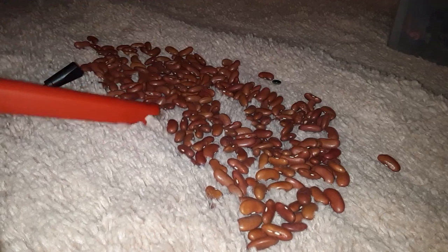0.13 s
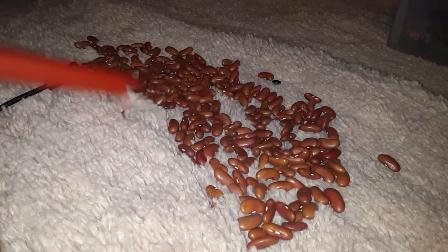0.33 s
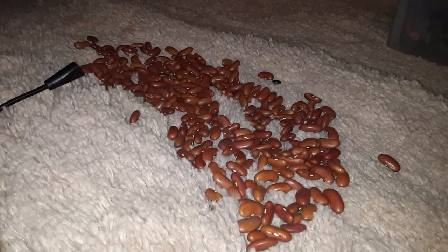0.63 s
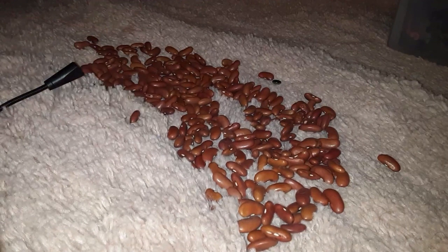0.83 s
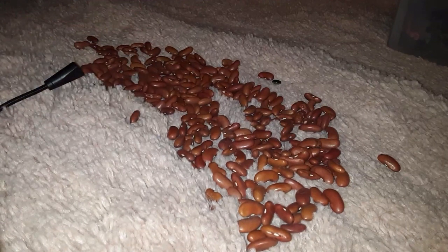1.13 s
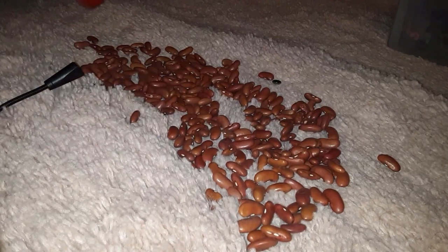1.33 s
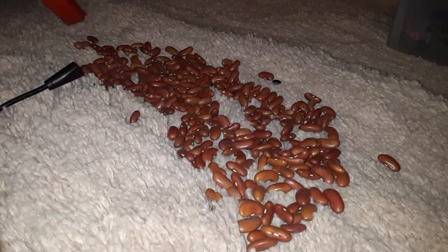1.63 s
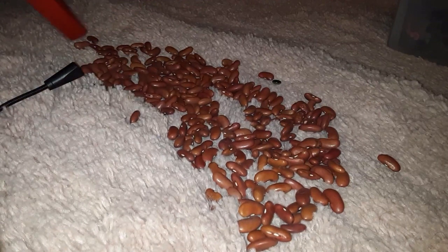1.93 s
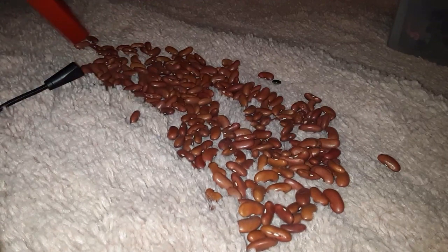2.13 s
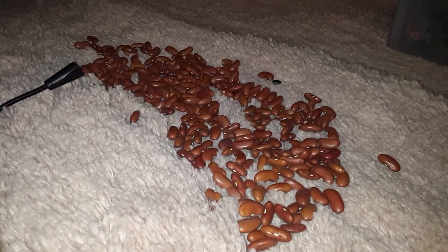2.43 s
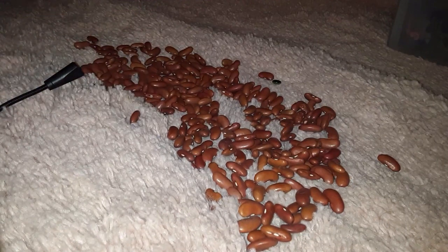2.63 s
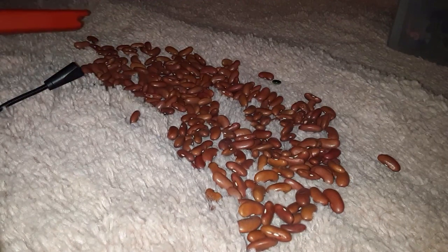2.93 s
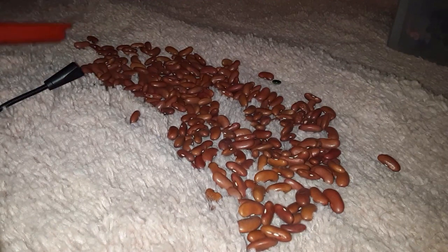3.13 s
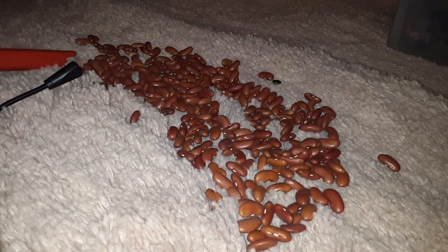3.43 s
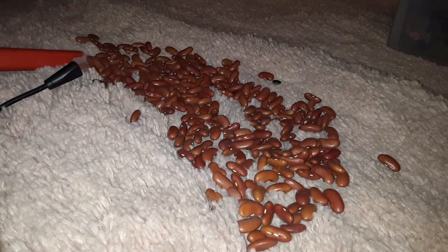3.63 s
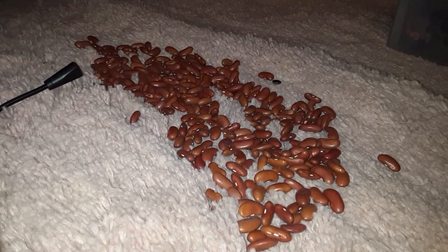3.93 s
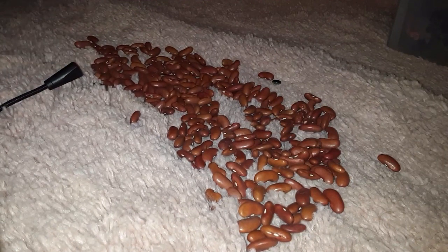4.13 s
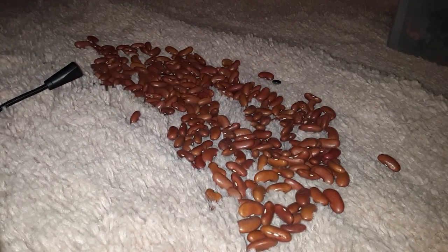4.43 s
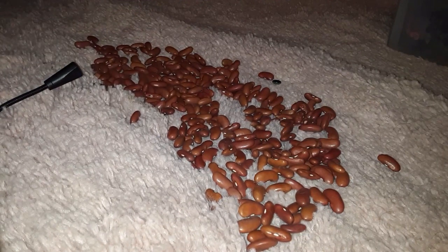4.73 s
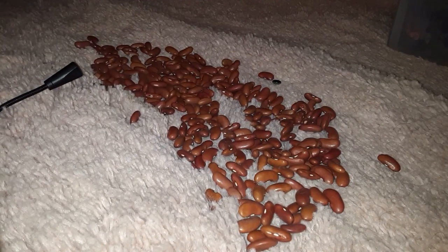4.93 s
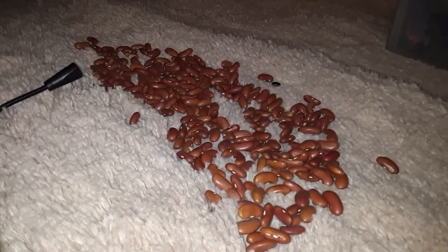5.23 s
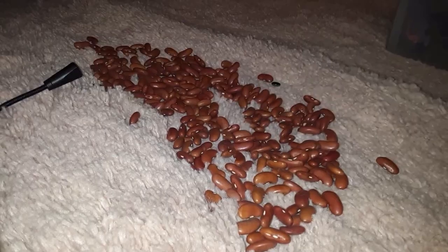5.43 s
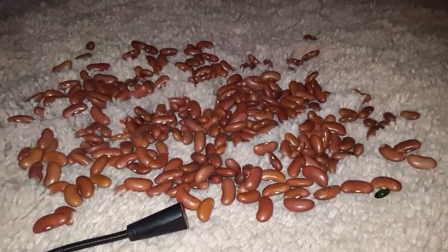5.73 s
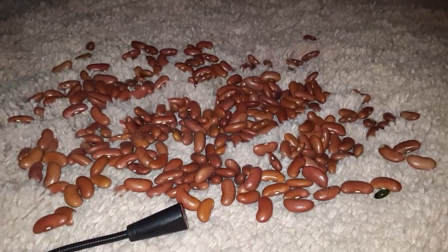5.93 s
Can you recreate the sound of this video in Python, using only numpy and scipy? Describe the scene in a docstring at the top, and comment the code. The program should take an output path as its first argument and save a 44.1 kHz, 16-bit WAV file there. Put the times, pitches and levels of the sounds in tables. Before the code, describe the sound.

A vacuum crevice tool swallows dry beans in two short rattling bursts, its airy hiss swelling and sinking near the carpet before the motor suddenly sounds close.

```python
"""A vacuum cleaner's crevice tool hovers over dry beans on a carpet, close to a small microphone. Its air is
coloured noise in two bands, a rush and a sizzle, swelling as the tool comes near the carpet. The motor hums
behind as shaft and blade tones over exhaust noise; at 5.6 s it suddenly grows much louder and fuller. Twice a
clump of beans rattles up the plastic tube as short ringing blows, chokes the air and lets the motor race. At
the end a short echo turns hiss and motor hollow."""
import sys
import numpy as np
from scipy import signal
from scipy.fft import rfft, irfft
from scipy.io import wavfile
from scipy.ndimage import uniform_filter1d, minimum_filter1d, map_coordinates

SR = 44100
rng = np.random.default_rng(int(sys.argv[2]) if len(sys.argv) > 2 else 0)


def wav_record(signal):
    """Record a signal, one row per channel, as 16-bit PCM in the file named by sys.argv[1]."""
    frames = np.transpose(np.atleast_2d(signal))
    bounded = np.clip(frames, -1, 1)
    # unit amplitude maps onto the largest positive 16-bit level
    quanta = np.round(bounded * 32767).astype(np.int16)
    wavfile.write(sys.argv[1], SR, quanta)


N = 268569

# air at the slot as the tool nears the carpet and leaves it: start_s, rush_db, sizzle_db
AIR_LEVELS = [(0, -30.5, -42), (.28, -37, -64), (.6, -37.5, -47), (1.08, -38.5, -39.5), (1.55, -25, -27.5),
              (1.8, -17, -17), (2.24, -16, -16.5), (2.41, -23.5, -24), (2.56, -22.5, -23.5),
              (2.96, -15, -15.5), (3.3, -16, -17), (3.41, -20, -25), (3.53, -20, -23), (3.6, -28.5, -21.5),
              (4.15, -33.5, -31.5), (4.96, -32.5, -29), (5.32, -21.5, -19.5), (5.58, -22, -19.5),
              (5.6, -25, -26.5), (6.09, -25, -24.5)]
# band cancelled by the echo off the carpet as the tool moves: start_s, notch_hz, depth_db
CARPET_NOTCH = [(.3, 9500, -1), (.57, 10700, -4.5), (1.25, 10900, -6), (1.7, 12600, -6), (2.22, 14800, -2),
                (2.45, 12100, -3.5), (3.0, 10000, -5), (3.2, 11800, -3.5), (3.62, 6160, -2.5),
                (3.75, 8900, 0), (4.0, 13800, -4), (5.58, 15800, -5), (5.6, 10500, -6)]
# colour of the air noise, relative levels: pitch_hz, level_db
AIR_COLOUR = [(18, -60), (30, -25.5), (103, -9), (183, -5.5), (279, -5), (424, -10), (735, -4.5),
              (1030, -9.5), (1750, -11.5), (3280, -5), (3640, -3.5), (5990, -1), (9860, 2.5), (12800, -3),
              (15800, -18)]
# air resonances of the tool, added on top of the colour: pitch_hz, width_hz, added_db
TUBE_RESONANCES = [(790, 830, -13.5), (1380, 94, -4.5), (2984, 85, -1.5), (3630, 110, -4), (4330, 130, -12),
                   (4900, 210, -29), (6000, 49, -2), (6600, 140, -23)]
# motor tones, the ninth from the fan blades: multiple of the speed, far_db, near_db
MOTOR_TONES = [(1, -52, -29.5), (2, -55, -40), (9, -49, -27)]
# colour of the motor and exhaust noise, relative levels: pitch_hz, level_db
EXHAUST_COLOUR = [(40, -9), (65, -12), (130, -10), (260, 1.5), (430, -5.5), (720, -1.5), (1100, -5),
                  (1750, -9.5), (2150, -5), (2500, -14), (4000, -7.5), (9000, -9), (12500, -15),
                  (15500, -39)]
# resonances of the motor housing, added on top of the colour: pitch_hz, width_hz, added_db
HOUSING_RESONANCES = [(249, 18, -7), (603, 160, -3), (845, 44, -2), (965, 22, 9.5), (1315, 130, 0),
                      (4270, 200, -8), (6050, 180, -2), (6600, 200, -22)]
# how near the motor sounds: start_s, nearness (0 far to 1 near)
NEARNESS = [(0, .15), (1.2, .13), (4.0, 0), (5.1, 0), (5.58, .25), (5.6, 1), (6.09, 1)]
# the hose sings unsteadily, one row: pitch_hz, width_hz, near_db
HOSE_TONE = (838, 14, -30.5)
# beans block the tube and the unloaded motor races: start_s, end_s
BLOCKAGES = [(.10, .48), (3.70, 3.89)]
# dull knocks of beans against the tip, before the mode levels: start_s, level_db
KNOCKS = [(0.052, -8.5), (0.124, -9), (0.141, -6), (0.253, -11), (0.282, -22), (0.333, -20), (0.359, -3),
          (0.371, -5), (0.384, -12), (0.394, -2.5), (0.44, -5.5), (0.455, -6.5), (3.787, -1.5),
          (3.828, -3.5)]
# pressure thumps as a bean plugs the slot, before the mode levels: start_s, level_db
PLUGS = [(0.052, -19), (0.106, -12), (0.126, -18.5), (0.181, -18), (0.402, -13.5), (0.447, -19),
         (0.459, -14.5), (3.539, -17), (3.701, -18.5), (3.748, -12.5), (3.781, -9.5), (3.834, -15)]
# hardest hits of beans on the tube wall, before the mode levels: start_s, level_db
CLICKS = [(0.0526, -3), (0.0572, -2), (0.0738, -7), (0.114, -4), (0.1286, -7), (0.133, -6), (0.1406, -3),
          (0.158, -8), (0.1804, -6), (0.1855, 0), (0.4053, -2), (0.4092, 0), (0.4173, 0), (0.4317, -1),
          (0.4532, -1), (0.4606, 1), (3.5398, -4), (3.5479, -1), (3.699, -3), (3.7063, -1), (3.7499, 0),
          (3.7625, 0), (3.7848, -1), (3.8264, 1)]
# clumps ricocheting up the tube: start_s, end_s, clicks_per_s, typical level_db before the mode levels
CLUMPS = [(.059, .075, 200, -11.5), (.104, .153, 190, -9.5), (.171, .191, 200, -8.5),
          (.394, .445, 140, -2.5), (.452, .468, 140, -2), (3.71, 3.83, 90, -1)]
# what each kind of blow rings with, around these pitches: pitch_hz, level_db, t60_s
KNOCK_MODES = [(458, -5, 0.0057), (730, -3.5, 0.012), (1010, -8, 0.0068), (1410, -8.5, 0.01),
               (2260, -17, 0.004)]
PLUG_MODES = [(125, -3.5, 0.076), (187, 9.5, 0.027), (296, -23, 0.019)]
CLICK_MODES = [(900, -19, .005), (2800, -17, .003), (4600, -1, .005), (5400, -1, .003), (7600, -7, .002),
               (10800, -6, .0015)]
# gulps of air as the slot comes free, levels at the crest: crest_s, rush_db, sizzle_db
GULPS = [(.075, -32, -38), (.12, -26, -50), (.435, -17, -22), (3.555, -21.5, -21), (3.67, -27, -22),
         (3.732, -12.5, -20), (3.833, -13.5, -17.5)]
# the hiss turns hollow and rises at the end: start_s, comb_spacing_hz, echo_strength (gain)
HOLLOW = [(5.58, 3000, 0), (5.6, 3000, .3), (5.8, 3050, .3), (5.95, 3180, .35), (6.09, 3500, .35)]

IDLE_HZ, SAG_HZ_PER_S = 481.2, .24  # motor speed at the start, and its steady sag
RACE_HZ, INERTIA_S = 24, .4  # speed gain a long blockage would reach, and its time constant
CHOKE_DB, CHOKE_S = -12, .0027  # flow lost to one plugging bean, and the width of that dip
CLUMP_THROTTLE_DB = -3
RICOCHET_SPREAD_DB = 1.8
GULP_ATTACK_S, RUSH_RELEASE_S, SIZZLE_RELEASE_S = .044, .079, .11  # time constants
BASS_CUT_HZ, CUTOFF_HZ = 58, 15850


def amp(db):
    """Decibels to gain."""
    return 10 ** (np.asarray(db) / 20)


def rms_one(x):
    """Scale to unit rms."""
    return x / np.sqrt(np.mean(x ** 2) + 1e-20)


def in_time(rows):
    """Each column of a curve at every sample."""
    s, *columns = np.transpose(rows)
    return [np.interp(np.arange(N) / SR, s, column) for column in columns]


def during(spans):
    """1 inside each span of time, 0 outside."""
    t = np.arange(N) / SR
    return sum((t > start) & (t < end) for start, end, *_ in spans) * 1.0


def drift(per_s):
    """Smooth random wander with spread 1, its fast motion fading above per_s."""
    hz = np.arange(N // 2 + 1) * SR / N
    spectrum = rfft(rng.standard_normal(N))
    return rms_one(irfft(spectrum / (1 + (hz / per_s) ** 2), N))


def coloured_noise(colour_rows, resonances):
    """Noise with a broad colour, lifted at a few resonances, at unit rms."""
    hz = np.maximum(np.arange(N // 2 + 1) * SR / N, 1)
    points, level_db = np.transpose(colour_rows)
    colour = amp(np.interp(np.log(hz), np.log(points), level_db))
    lift = 1
    for centre, width, db in resonances:
        lift = lift + amp(db) / (1 + (2 * (hz - centre) / width) ** 2)
    return rms_one(irfft(rfft(rng.standard_normal(N)) * colour * lift, N))


def evened(x):
    """Hold the rms near 1 over tenths of a second."""
    return x / np.sqrt(uniform_filter1d(x ** 2, SR // 10) + 1e-12)


def suction(flutter_db, surge_db, split_hz):
    """Turbulent air at the slot: a broad rush, and a sizzle that grows as the tip faces the carpet."""
    jet = coloured_noise(AIR_COLOUR, TUBE_RESONANCES)
    jet = over_carpet(jet, dip_hz=1310, hump_share=.81, hump_ratio=.52)
    rush = signal.sosfiltfilt(signal.butter(3, split_hz, fs=SR, output="sos"), jet)
    sizzle = jet - rush
    # the gulps add to the steady air as power
    rush_gain, sizzle_gain = np.sqrt(amp(in_time(AIR_LEVELS)) ** 2 + gulps())
    hiss = rush_gain * evened(rush) + sizzle_gain * evened(sizzle)
    unsteadiness = amp(flutter_db * drift(350) + surge_db * drift(23))
    return hiss * unsteadiness * slot_opening()


def over_carpet(jet, dip_hz, hump_share, hump_ratio):
    """The echo off the carpet cancels one band and reinforces a lower one; both slide with the tool."""
    hz, s, frames = signal.stft(jet, SR, nperseg=512)
    times, *columns = np.transpose(CARPET_NOTCH)
    notch_hz, depth_db = (np.interp(s, times, column) for column in columns)
    hz = hz[:, None]
    dip = np.exp(-((hz - notch_hz) / dip_hz) ** 2)
    hump = np.exp(-((hz - hump_ratio * notch_hz) / (2 * dip_hz)) ** 2)
    shaped = frames * amp(depth_db * (dip - hump_share * hump))
    return signal.istft(shaped, SR)[1][:N]


def motor(far_db, near_db, waver, throb_db):
    """Shaft and blade tones and the singing hose over the exhaust noise."""
    near, = in_time(NEARNESS)
    turns = np.cumsum(motor_speed() * (1 + waver * drift(6.7))) / SR
    distance = amp((1 - near) * (far_db - near_db))
    exhaust = amp(near_db) * coloured_noise(EXHAUST_COLOUR, HOUSING_RESONANCES)
    out = distance * (exhaust + near * hose_song())
    for multiple, tone_far_db, tone_near_db in MOTOR_TONES:
        level_db = tone_far_db + near * (tone_near_db - tone_far_db) + throb_db * drift(41)
        tone = np.sqrt(2) * np.sin(2 * np.pi * multiple * turns)
        out += amp(level_db) * tone
    return out


def motor_speed():
    """Turns per second: the motor races while the tube is blocked and settles back with its inertia."""
    keep = np.exp(-1 / (INERTIA_S * SR))
    racing = signal.lfilter([1 - keep], [1, -keep], during(BLOCKAGES))
    return IDLE_HZ - SAG_HZ_PER_S * np.arange(N) / SR + RACE_HZ * racing


def hose_song():
    """An unsteady tone: two wandering strengths on a sine and a cosine blur its pitch and level."""
    hose_hz, width_hz, near_db = HOSE_TONE
    phase = 2 * np.pi * hose_hz * np.arange(N) / SR
    return amp(near_db) * (drift(width_hz) * np.cos(phase) + drift(width_hz) * np.sin(phase))


def beans():
    """Beans knock on the tip, plug the slot and ricochet up the tube."""
    knocks = blows(KNOCKS, KNOCK_MODES, contact_s=.00032, spread=.082,
                   rebound_db=-6.5, rebound_s=.0034, count=4)
    thumps = blows(PLUGS, PLUG_MODES, contact_s=.0026, spread=.06,
                   rebound_db=-7, rebound_s=.00496, count=1)
    clicks = blows(CLICKS + ricochets(), CLICK_MODES, contact_s=.00011, spread=.06,
                   rebound_db=-12, rebound_s=.0013, count=3)
    return clicks + knocks + thumps


def blows(events, modes, contact_s, spread, rebound_db, rebound_s, count):
    """Each blow and its rebounds ring the modes, at pitches that vary with the spot hit."""
    hz, mode_db, t60 = np.transpose(modes)[:, :, None]
    t = np.arange(int(np.max(t60) * SR)) / SR
    out = np.zeros(N + SR)
    # the ring builds up over the time of contact, then dies
    fade = (1 - np.exp(-(t / contact_s) ** 2)) * amp(mode_db - 60 * t / t60)
    for s, db in events:
        gaps = rebound_s * rng.uniform(.3, 1.7, count)
        delays = np.append(0, np.cumsum(gaps))
        # later rebounds tend to be 2 dB weaker each time
        rebounds_db = rebound_db + rng.normal(0, 2, count) - 2 * np.arange(count)
        sizes_db = np.append(0, rebounds_db)
        for delay, size_db in zip(delays, sizes_db):
            pitch = hz * np.exp(spread * rng.standard_normal(hz.shape))
            ring = np.sum(fade * np.sin(2 * np.pi * pitch * t), axis=0)
            start = int((s + delay) * SR)
            out[start:start + len(t)] += rng.choice([-1, 1]) * amp(db + size_db) * ring
    return out[:N]


def ricochets():
    """Unevenly spaced clicks of uneven strength through each clump: start_s, level_db."""
    clicks = []
    for start, end, per_s, db in CLUMPS:
        for s in np.arange(start, end, 1 / per_s):
            level_db = db + RICOCHET_SPREAD_DB * rng.standard_normal()
            clicks.append((s + rng.random() / per_s, level_db))
    return clicks


def slot_opening():
    """A bean in the slot cuts the flow for a few milliseconds; a clump in the tube throttles it."""
    t = np.arange(N) / SR
    plugged = 0
    for s, _ in PLUGS:
        plugged = plugged + np.exp(-np.minimum(((t - s - CHOKE_S) / CHOKE_S) ** 2, 20))
    clumped = uniform_filter1d(during(CLUMPS), size=220)  # edges softened over 5 ms
    return amp(CHOKE_DB * plugged + CLUMP_THROTTLE_DB * clumped)


def gulps():
    """Power that freed air adds to rush and sizzle: each gulp swells fast to its crest and dies away."""
    rush = sizzle = 0
    for s, rush_db, sizzle_db in GULPS:
        t = np.arange(N) / SR - s
        rise, since = np.minimum(t, 0) / GULP_ATTACK_S, np.maximum(t, 0)
        rush_shape = np.exp(np.maximum(rise - since / RUSH_RELEASE_S, -20))
        sizzle_shape = np.exp(np.maximum(rise - since / SIZZLE_RELEASE_S, -20))
        rush = rush + (amp(rush_db) * rush_shape) ** 2
        sizzle = sizzle + (amp(sizzle_db) * sizzle_shape) ** 2
    return rush, sizzle


def hollowed(x):
    """One short echo whose path shrinks, so its comb of peaks rises."""
    spacing_hz, strength = in_time(HOLLOW)
    echo = map_coordinates(x, [np.arange(N) - SR / spacing_hz], order=3, mode="nearest")
    return (x + strength * echo) / np.sqrt(1 + strength ** 2)


def limited(x, ceiling_db, release_db_per_s):
    """A fast limiter: each peak over the ceiling pushes the gain down, which then recovers steadily."""
    recovery = release_db_per_s * np.arange(N) / SR
    level_db = 20 * np.log10(np.abs(x).max(axis=0) + 1e-9)
    over_db = np.maximum(level_db - ceiling_db, 0)
    cut_db = np.maximum.accumulate(over_db + recovery) - recovery
    # start each cut just ahead of its peak and smooth it
    gain_db = uniform_filter1d(minimum_filter1d(-cut_db, size=21), size=21)
    return x * amp(gain_db)


def scene():
    """Hiss and motor pass through the hollow echo, the beans join dry; both channels are alike."""
    hiss = suction(flutter_db=.5, surge_db=.65, split_hz=6680)
    hum = motor(far_db=-43, near_db=-22.5, waver=.00033, throb_db=-1.5)
    sound = hollowed(hiss + hum) + beans()
    return np.array([sound, sound])


def record(dry):
    """The microphone sheds deep bass, a limiter holds the peaks and the top is cut."""
    thin = signal.sosfilt(signal.butter(3, BASS_CUT_HZ, "high", fs=SR, output="sos"), dry)
    held = limited(thin, ceiling_db=-1.2, release_db_per_s=700)
    top_cut = signal.ellip(8, .05, 60, CUTOFF_HZ, fs=SR, output="sos")
    return signal.sosfiltfilt(top_cut, held)


dry = scene()
out = record(dry)
wav_record(out)
```